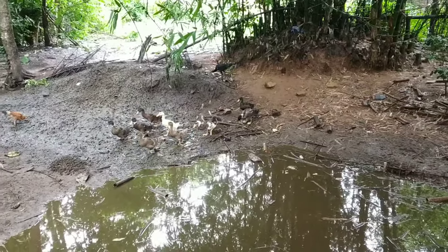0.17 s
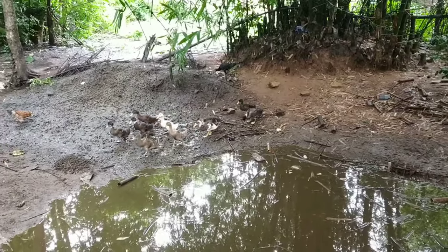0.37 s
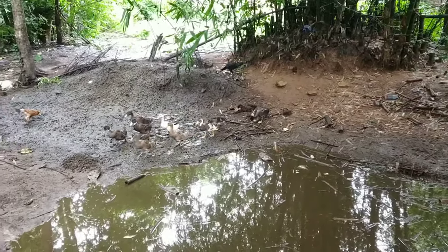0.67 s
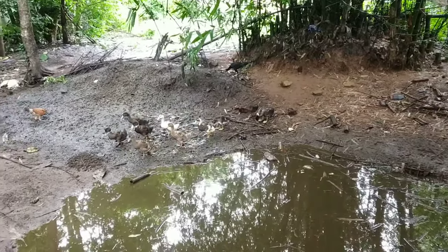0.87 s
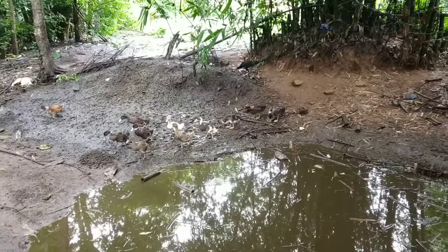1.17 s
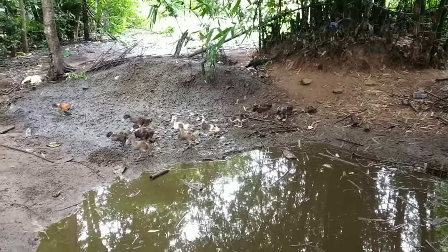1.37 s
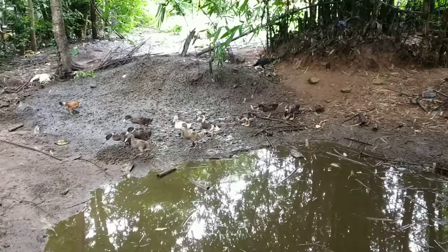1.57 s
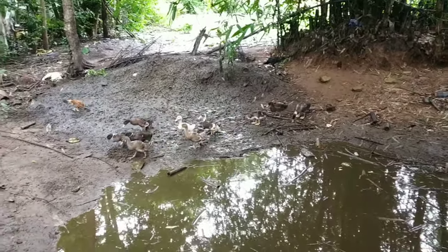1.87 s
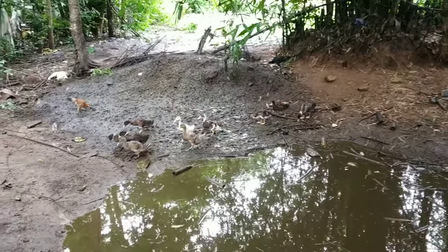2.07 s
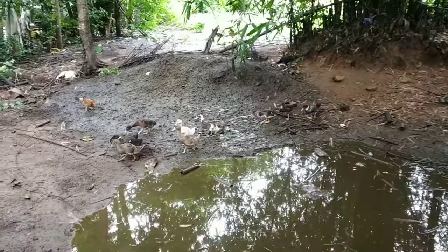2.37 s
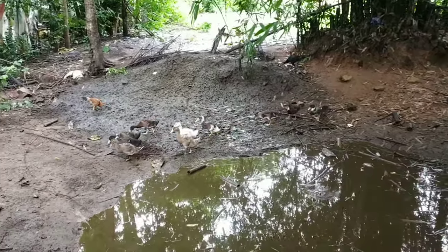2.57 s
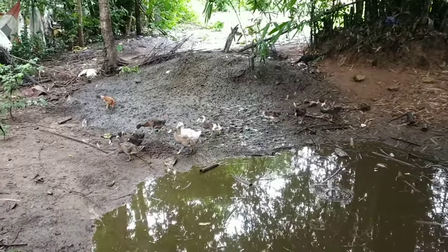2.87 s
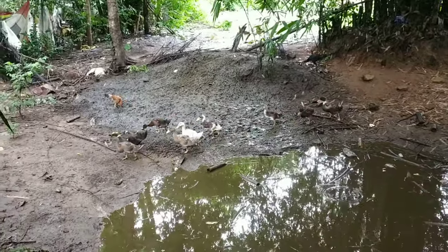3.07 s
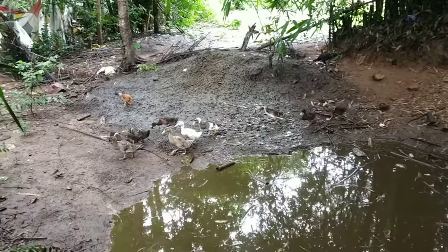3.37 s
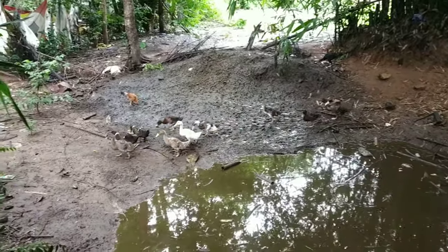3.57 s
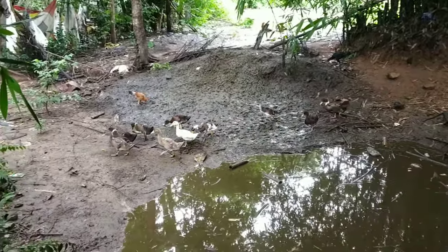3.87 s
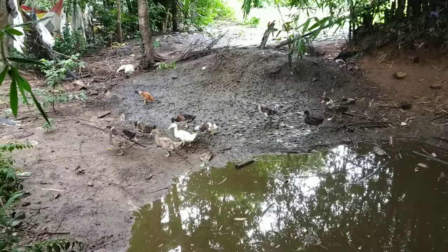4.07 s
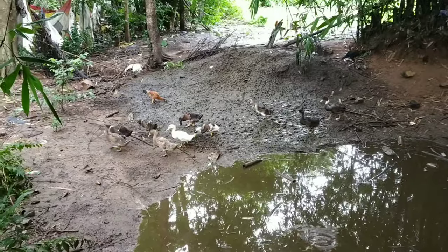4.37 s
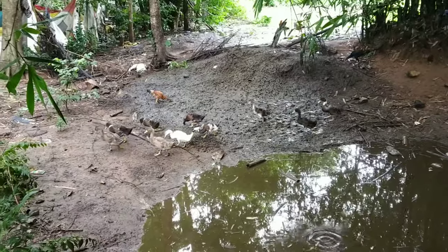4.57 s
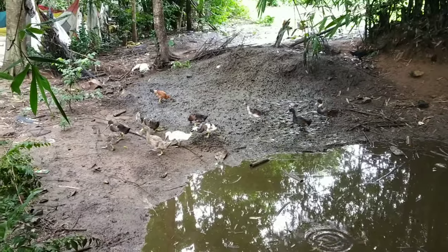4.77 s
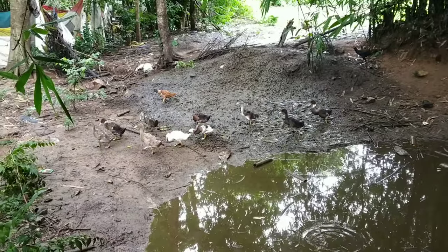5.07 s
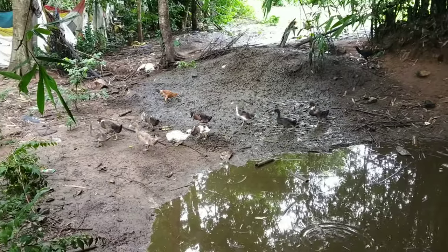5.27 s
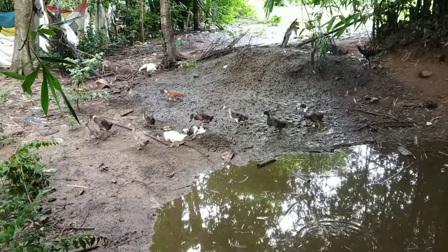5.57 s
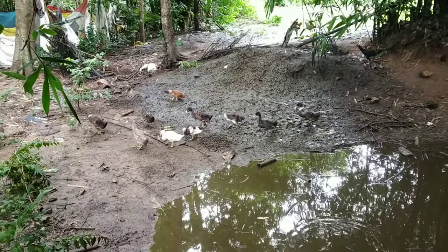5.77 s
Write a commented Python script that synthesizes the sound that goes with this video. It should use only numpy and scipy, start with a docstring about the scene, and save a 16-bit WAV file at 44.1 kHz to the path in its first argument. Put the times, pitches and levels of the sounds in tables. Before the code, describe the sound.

A flock sifts wet mud beneath bamboo, making a dense bed of tiny clicks with snapping smacks and a few longer splashes throughout. Peeps come in quick slurs at first and stop around three seconds; a raspy trill follows, then four thin whistles near the end. Sparse muted clucks and drops punctuate it. A far pump-like engine throbs quietly under smooth hiss, captured by a stereo microphone in open air with little echo.

```python
"""Beside a pond, under bamboo, ducks and a few hens forage in wet mud. Bills and feet smack and splash as
clustered noise bursts; peeps, clucks and wild birds are gliding tones, one a pulse-driven rasping trill.
Drops plop as decaying sines that rise. Behind lie a hiss of leaves and a soft wash, both filtered noise,
and the throb of a far engine, perhaps a pump, as exhaust resonances. The grove adds short scatter."""
import sys
import numpy as np
from scipy import signal
from scipy.fft import rfft, irfft
from scipy.io import wavfile

SR = 44100
rng = np.random.default_rng(int(sys.argv[2]) if len(sys.argv) > 2 else 0)


def store_wav(level_fs):
    """Save 16-bit WAV to argv[1]."""
    pcm = np.round(np.clip(np.atleast_2d(level_fs), -1, 1) * 32767)
    wavfile.write(sys.argv[1], SR, pcm.T.astype(np.int16))


N = 261072
TIME = np.arange(N) / SR
EDGE_HZ = 15700  # upper limit of the band

# How busily the flock dabbles. Each row: time in seconds, relative level in dB.
BUSY_CURVE = [(0.0, -43), (0.69, -44.5), (1.6, -42.5), (1.94, -43.5), (2.16, -43), (4.32, -45), (4.65, -41),
              (5.2, -43), (5.92, -43.5)]


def gain_of(db):
    """Level is logarithmic: 20 dB is a factor of ten in amplitude."""
    return 10 ** (np.asarray(db) / 20)


def evened(x):
    """Root-mean-square amplitude measures strength; it is scaled to 1."""
    return x / np.sqrt(np.mean(x ** 2) + 1e-20)


def read(points, hz):
    """Interpolates a spectrum along log frequency, so that octaves have nearly equal length."""
    f, value = np.transpose(points)
    return np.interp(np.log(hz + 1), np.log(f + 1), value)


def swing_db(curve):
    """Rise and fall of a level curve about its mean in dB."""
    s, db = np.transpose(curve)
    return np.interp(TIME, s, db - db.mean())


def add(mix, s, sound):
    """Superposition: a sound starting at s seconds sums with those already there."""
    part = mix[..., max(round(s * SR), 0):][..., :sound.shape[-1]]
    part += sound[..., :part.shape[-1]]


def shaped(x, curve_db):
    """Linear filtering: each frequency is scaled by the gain in dB that the function gives for it."""
    size = x.shape[-1]
    return irfft(rfft(x) * gain_of(curve_db(np.fft.rfftfreq(size, 1 / SR))), size)


def wander(size, rate_hz):
    """Low-passed noise drifts at random, no faster than about the given rate."""
    noise = rng.standard_normal(size + SR // 4)
    slow = shaped(noise, lambda f: -10 * np.log10(1 + (f / rate_hz) ** 4))
    return evened(slow)[:size]


def grove(x):
    """Sparse scattering: stems and ground give a short decaying tail, different at each port."""
    # Ring of the grove. Each row: frequency in Hz, time to fall by 60 dB in seconds.
    ring_times = [(300, 0.13), (2000, 0.17), (6000, 0.29), (15000, 0.13)]
    size = SR // 2
    echoes = rng.standard_normal((2, size)) * (rng.random((2, size)) < .15)
    hz, t, bands = signal.stft(echoes, SR, nperseg=256)
    decay_db = -60 * t / read(ring_times, hz)[:, None]
    tail = signal.istft(bands * gain_of(decay_db), SR, nperseg=256)[1]
    return signal.fftconvolve(np.atleast_2d(x), tail / np.linalg.norm(tail[0]), axes=1)[:, :N]


def placed(x, direct_db, wet_db, pan_db):
    """Level difference between the ports sets the side; scattered sound joins the direct sound."""
    pan = np.array([[pan_db], [-pan_db]]) / 2
    return x * gain_of(direct_db + pan) + gain_of(wet_db) * grove(x)


def leaves(level_db=-45):
    """Diffuse noise: leaves and distant rustling hiss smoothly, alike at both ports only in the bass."""
    # Spectrum of leaves and far surroundings. Each row: frequency in Hz, relative density in dB per Hz.
    air_spectrum = [(25, -42), (70, -13.5), (120, 4), (200, 15.5), (310, 8.5), (440, 3.5), (580, 4.5),
                    (720, 7.5), (950, -5.5), (1400, -3.5), (2500, -4.5), (3300, -7.5), (4200, -7.5),
                    (5000, -6), (6000, -2), (16000, 0)]
    # Each row: frequency in Hz, left-right likeness from 0 to 1 before its treble roll-off.
    likeness = [(60, 1), (150, 0.93), (380, 0.89), (950, 0.21), (2380, 0.078), (5980, 0.01), (15000, 0.83)]
    a, b = rfft(rng.standard_normal((2, N)))
    hz = np.fft.rfftfreq(N, 1 / SR)
    same = np.clip(read(likeness, hz), 0, 1) / (1 + (hz / 2500) ** 2)
    ports = np.array([a, same * a + np.sqrt(1 - same ** 2) * b])
    pair = irfft(ports * gain_of(read(air_spectrum, hz)), N)
    return evened(pair) * gain_of(level_db + swing_db(BUSY_CURVE) / 2)


def wash(centre_hz=950, db_per_octave=9):
    """Band-shaped noise: a soft, dull wash falls off to both sides of its centre and comes and goes."""
    # Each row: time in seconds, level in dB.
    wash_levels = [(1.0, -60), (2.9, -61), (4.2, -58), (4.55, -56.5), (5.2, -53), (5.45, -62)]
    noise = shaped(rng.standard_normal((2, N)),
                   lambda f: -db_per_octave * abs(np.log2((f + 1) / centre_hz)))
    return evened(noise) * gain_of(np.interp(TIME, *np.transpose(wash_levels)))


def engine(turns_per_s=24.635, idle=0.71, side_db=-21):
    """Amplitude modulation: thumps in each turn make exhaust resonances of tone and noise throb."""
    # Exhaust resonances. Each row: frequency in Hz, half-width in Hz at -6 dB, relative level in dB,
    # steady (tonal) share of the power from 0 to 1 in the middle signal.
    resonances = [(184.1, 9.72, -52.5, 0.79), (201, 17, -58, 0.13), (262.7, 13.68, -54, 0.57),
                  (231, 40, -60.5, 0)]
    # Each row: place as a share of the turn, half-width as a share of the turn, relative height.
    thumps = [(.03, 0.22, 0.81), (.37, 0.2, 0.83), (.63, 0.24, 0.049)]
    # The engine swells and fades on the air. Each row: time in seconds, relative level in dB.
    drift = [(0, -3), (1.1, -0.5), (2.2, 0), (2.9, -3.5), (3.6, -3), (4.2, -1.5), (5.2, -4.5), (5.9, 2)]
    turn = TIME * turns_per_s
    throb = idle
    for at, w, height in thumps:
        offset = (turn - at + .5) % 1 - .5
        throb = throb + height * np.exp(-(offset / w) ** 2)
    drone = np.zeros((2, N))  # middle and side signals
    for hz, width, db, steady in resonances:
        noise = rng.standard_normal((2, N))
        ring = evened(shaped(noise, lambda f: -20 * np.log10(1 + ((f - hz) / width) ** 2)))
        wavering_hz = hz + width / 2 * wander(N, 8.92)
        tone = evened(np.sin(2 * np.pi * np.cumsum(wavering_hz) / SR))
        steady = np.clip(steady, 0, 1)
        ring[0] = np.sqrt(steady) * tone + np.sqrt(1 - steady) * ring[0]
        drone += gain_of(db) * ring
    mid, side = drone * evened(throb) * gain_of(swing_db(drift))
    return np.array([mid + gain_of(side_db) * side, mid - gain_of(side_db) * side])


def voiced(hz, rough, husk, husk_hz, overtone_db, swell):
    """A modulated tone: pitch trembles, and random modulation lays a husky noise band about it."""
    tremble = wander(SR // 4, 350)[:len(hz)]
    in_step, across = (wander(SR // 4, husk_hz)[:len(hz)] for _ in range(2))
    phase = 2 * np.pi * np.cumsum(hz * (1 + rough * tremble)) / SR
    note = (1 + husk * in_step) * np.sin(phase) + husk * across * np.cos(phase)
    note = note + gain_of(overtone_db) * np.sin(2 * phase)
    return evened(note * signal.windows.cosine(len(hz)) ** swell)


def calls(rows, rough, overtone_db, husk_hz, swell):
    """Frequency glides: each note follows a parabola through three pitches, loudest in the middle."""
    out = np.zeros(N)
    for s, length, first_hz, middle_hz, last_hz, db, husk in rows:
        arch = np.polyfit([0, .5, 1], [first_hz, middle_hz, last_hz], 2)
        pitch = np.polyval(arch, np.linspace(0, 1, max(int(length * SR), 64)))
        add(out, s, gain_of(db) * voiced(pitch, rough, husk, husk_hz, overtone_db, swell))
    return out


def husky(rows, husk):
    """Equal modulation depth gives all notes of one bird the same huskiness."""
    return [(*row, husk) for row in rows]


def trill(pulse_hz=115, jitter=0.32, uneven_db=3, sag=0.11, settle_s=0.021):
    """Source and filter: uneven pulses ring two close throat resonances, which sag as the rasp swells."""
    # Throat of the bird. Each row: settled frequency in Hz, width in Hz at -3 dB, relative level in dB.
    throat = [(1966, 220, -1.5), (2310, 120, -7)]
    start_s, attack_s, hold_s, release_s = 3.385, .07, .06, .13
    peak_db, swell_db, fade_db = -41, 8, 17  # level in the hold, before placing; rise to it; fall from it
    corners = np.cumsum([0, attack_s, hold_s, release_s])
    t = np.arange(0, corners[-1], 1 / SR)
    level_db = peak_db - np.interp(t, corners, [swell_db, 0, 0, fade_db])
    turns = np.cumsum(pulse_hz * np.exp(jitter * wander(SR // 2, 90)[:len(t)])) / SR
    pulses = np.diff(np.floor(turns), prepend=0)
    pulses = pulses * gain_of(uneven_db * wander(SR // 2, 166)[:len(t)])
    voice = 0
    for hz, width, db in throat:
        sagging_hz = hz * (1 + sag * np.exp(-t / settle_s))
        turn = np.exp(2j * np.pi * np.cumsum(sagging_hz) / SR)
        # a low-pass around the moving pitch acts as a moving resonance
        low_pass = signal.butter(2, width / 2, fs=SR, output="sos")
        ring = signal.sosfilt(low_pass, pulses / turn)
        voice = voice + gain_of(db) * evened((ring * turn).real)
    out = np.zeros(N)
    add(out, start_s, gain_of(level_db) * evened(voice))
    return out


def whistles(overshoot=0.137, settle_s=0.0082):
    """Exponential settling: each whistle of a bird in the trees starts sharp, drops and holds its pitch."""
    # Each row: start in seconds, length in seconds, settled pitch in Hz, level in dB before placing.
    whistle_rows = [(4.572, 0.13, 2745, -51), (4.785, 0.061, 2770, -52), (4.99, 0.15, 2781, -50),
                    (5.454, 0.18, 2787, -49)]
    out = np.zeros(N)
    for s, length, hz, db in whistle_rows:
        t = np.arange(0, length, 1 / SR)
        pitch = hz * (1 + overshoot * np.exp(-t / settle_s))
        note = voiced(pitch, rough=0.013, husk=0.59, husk_hz=70, overtone_db=-38, swell=0.3)
        add(out, s, gain_of(db) * note)
    return out


def plops():
    """Bubble resonance: each rings for a short time and rises as it nears the surface."""
    # Drops and bubbles. Each row: start in seconds, first pitch in Hz, level in dB before placing,
    # rise in octaves per second (up to one octave), decay time in seconds.
    plop_rows = [(1.147, 700, -28, 10, 0.0028), (1.362, 1500, -28, 90, 0.0015),
                 (1.633, 2420, -25, 8, 0.0021), (2.187, 5940, -30.5, 39, .002),
                 (3.327, 1100, -32, 160, 0.0015), (3.38, 2420, -34, 60, 0.0017),
                 (3.69, 1100, -34, 150, .0012), (3.988, 1630, -26, 220, 0.0019),
                 (5.032, 1040, -19, 7.2, 0.0017), (5.396, 3470, -33.5, 2, 0.0024),
                 (5.589, 1670, -27.5, 22, 0.0017)]
    out, t = np.zeros(N), np.arange(SR // 40) / SR
    for s, hz, db, rise, decay in plop_rows:
        pitch = hz * 2 ** np.minimum(rise * t, 1)
        ring = np.exp(-t / decay) * (1 - np.exp(-2 * t * hz))
        add(out, s, gain_of(db) * ring * np.sin(2 * np.pi * np.cumsum(pitch) / SR))
    return out


def burst(decay, tilt_db, grain_db, shared, snap=0, colour_db=0.0, rise_s=0.0021):
    """Impulsive noise: tiny bursts cluster, with a water-film snap if asked; cavities may colour them."""
    t = np.arange(SR // 4) / SR
    steps = np.repeat(rng.standard_normal(len(t)), 12)[:len(t)].clip(-2, 2)  # one level per 12 samples
    grains = gain_of(grain_db * steps)
    common, own = rng.standard_normal(len(t)), rng.standard_normal((2, len(t)))
    noise = shared * common + own
    fade = np.exp(-t / max(decay, .0005)) * (1 - np.exp(-t / rise_s))
    crack = snap * np.exp(-((t - .0013) / .0003) ** 2)
    # differencing makes the snap brighter than the rest
    cluster = noise * evened(grains) * fade + np.diff(noise * crack, prepend=0)
    cavities = np.linspace(0, SR / 2, num=30)
    peaks_db = colour_db * rng.uniform(-3.5, 1, len(cavities))

    def colour(f):
        """Spectral tilt in dB per octave plus hollow peaks and dips."""
        octaves = np.log2(np.clip(f, 700, EDGE_HZ) / 7000)
        return tilt_db * octaves + np.interp(f, cavities, peaks_db)

    band = signal.butter(2, [450, EDGE_HZ], "band", fs=SR, output="sos")
    cluster = signal.sosfilt(band, shaped(cluster, colour))
    return evened(cluster) * np.sqrt(np.mean(fade ** 2))


def dabbling(level_db=-52.5, per_s=260, wet_db=0):
    """Random superposition: many small ticks of bills sifting the mud fall at independent times."""
    out, decays = np.zeros((2, N)), np.geomspace(.001, .007, num=120)  # decay times in seconds
    ticks = []
    for decay in decays:
        tick = burst(decay, rng.normal(.3, .5), grain_db=4, shared=.6, colour_db=7)
        ticks.append(evened(tick)[:, :2048])
    for when, which, chance in rng.random((int(per_s * N / SR), 3)):
        size = gain_of(3.5 * min(-np.log(1 - chance), 2.5))  # large ticks are rare
        add(out, when * N / SR, size * ticks[int(which * len(ticks))])
    out = evened(out) * gain_of(level_db + swing_db(BUSY_CURVE))
    return out + gain_of(wet_db) * grove(out)


def mud(smack_db=-2.5, splash_db=-1, wet_db=-3):
    """Impact noise: bills and feet excite short smacks and longer splashes, scattered by the grove."""
    # Sharp wet smacks. Each row: start in seconds, relative level in dB, decay time in seconds,
    # brightness in dB per octave.
    smack_rows = [(.121, -29.5, 0.0054, 5), (0.1795, -24.5, 0.0037, 2), (0.308, -22.5, 0.0051, 0.5),
                  (.409, -25, 0.0029, -0.5), (0.5435, -28, 0.0068, 1.5), (0.647, -15.5, 0.0038, 1),
                  (.751, -25.5, 0.0032, -0.5), (0.783, -21.5, 0.0044, 1.5), (1.094, -28, .002, -2),
                  (1.106, -31, .003, -3), (1.1416, -30, 0.006, -2.5), (1.1778, -22.5, 0.003, 4),
                  (1.258, -25, 0.0026, -1), (1.3606, -22.5, 0.0024, -3), (1.4691, -11.5, 0.0026, 7.5),
                  (1.628, -29, 0.0068, -1), (1.7225, -21, 0.0013, 3), (2.1872, -26.5, 0.0023, -3),
                  (2.256, -19, .002, 7), (2.689, -33.5, 0.0072, -3), (2.902, -33, 0.0018, -1),
                  (3.082, -21.5, 0.002, -2), (3.1373, -15, 0.0027, 0.5), (3.1784, -18.5, 0.0037, 11),
                  (3.3894, -19, 0.0025, -1.5), (3.454, -21.5, 0.0039, 6.5), (3.632, -32.5, 0.0068, 1.5),
                  (3.784, -27, 0.0065, 11), (3.886, -31, 0.0053, 1.5), (3.958, -27, .003, 9),
                  (4.047, -12, 0.0019, 11), (4.2885, -20.5, 0.0044, 3), (4.408, -19, .0012, 10),
                  (4.601, -32, 0.0016, 5), (4.954, -17, 0.0022, 4), (5.031, -24, 0.0024, -1),
                  (5.132, -42, 0.003, -10), (5.271, -30.5, 0.0043, 0), (5.367, -28.5, 0.0039, 3),
                  (5.557, -18.5, .0034, 16), (5.58, -19.5, 0.0048, 6), (5.7494, -24.5, 0.0032, 7)]
    # Longer splashes. Each row: start in seconds, relative level in dB, decay time in seconds,
    # brightness in dB per octave.
    splash_rows = [(0.005, -47.5, 0.12, 3), (0.925, -42, 0.13, 5), (1.591, -36.5, 0.065, 9.5),
                   (2.114, -43, 0.05, 0), (3.141, -41, 0.15, 5), (4.08, -38, 0.019, 6),
                   (4.474, -35.5, 0.012, 4.5), (4.53, -38, .014, 15), (4.66, -57, .04, -5),
                   (4.794, -29, 0.023, 19)]
    out = np.zeros((2, N))
    for s, db, decay, tilt_db in smack_rows:
        smack = burst(decay, tilt_db, grain_db=3.0, shared=0.3, snap=0.99)
        add(out, s, gain_of(db + smack_db) * smack)
    for s, db, decay, tilt_db in splash_rows:
        splash = burst(decay, tilt_db, grain_db=-1, shared=0.81)
        add(out, s, gain_of(db + splash_db) * splash)
    return out + gain_of(wet_db) * grove(out)


def scene():
    """Superposition of the far engine, leaves and wild birds with the flock and the water near by."""
    # Thin falling chirp of a small bird. Each row: start in seconds, length in seconds,
    # first, middle and last pitch in Hz, level in dB before placing.
    chirp_rows = [(.872, .074, 5000, 4800, 4300, -55.5)]
    # Soft low clucks. Each row: start in seconds, length in seconds,
    # first, middle and last pitch in Hz, level in dB before placing.
    cluck_rows = [(.01, 0.19, 383, 404, 380, -58.5), (1.24, 0.037, 680, 757, 800, -48),
                  (1.745, 0.046, 687, 746, 780, -54), (3.527, .052, 797, 805, 830, -50),
                  (4.035, 0.055, 798, 861, 780, -50), (4.515, 0.035, 693, 767, 720, -47.5),
                  (5.06, 0.19, 731, 793, 734, -52)]
    # Duckling peeps, quick slurs and longer round arches. Each row: start in seconds, length in seconds,
    # first, middle and last pitch in Hz, level in dB before placing, huskiness as modulation depth.
    peep_rows = [(.005, 0.024, 2280, 1830, 1430, -48.5, .3), (.408, 0.03, 1430, 1790, 2400, -50.5, 0.44),
                 (.452, 0.025, 2520, 1800, 1300, -50, .2), (.578, 0.016, 1350, 1840, 2400, -44.5, 0.37),
                 (.631, 0.02, 2330, 1720, 1440, -42.5, 0.18), (.725, .018, 1350, 1800, 2300, -45.5, .25),
                 (.785, 0.017, 2350, 1940, 1450, -54, .3), (.9, .022, 1450, 1840, 2200, -52, .4),
                 (1.096, .018, 1800, 2150, 2400, -52.5, 0.33), (1.152, 0.021, 2440, 2050, 1750, -46.5, .9),
                 (1.195, 0.025, 2910, 2180, 1550, -50.5, 0.57),
                 (1.264, 0.031, 1750, 2140, 2400, -50.5, 0.97), (1.322, 0.086, 1854, 2200, 1850, -50, 0.49),
                 (1.456, .058, 1590, 2005, 1700, -51.5, 0.22), (1.584, .028, 1600, 1850, 2050, -50, .25),
                 (1.602, 0.093, 1950, 2460, 1650, -54, 0.81), (1.645, 0.023, 2410, 2090, 1800, -51, .5),
                 (1.778, .05, 1700, 2240, 2500, -56.5, .7), (1.822, 0.033, 2650, 2105, 1450, -53.5, .5),
                 (2.085, 0.054, 2790, 2920, 2150, -53.5, .2), (2.263, 0.059, 1596, 2150, 1700, -55.5, .15),
                 (2.435, 0.079, 1800, 2250, 1720, -57.5, 0.47), (2.71, .035, 1350, 1240, 1200, -53, 0.33),
                 (2.772, .032, 2060, 1744, 1450, -54, .4), (2.915, 0.032, 1410, 1594, 1600, -52.5, 0.5),
                 (2.98, .07, 1555, 1516, 1250, -56, .4)]
    background = leaves() + engine() + wash()

    chirps = calls(husky(chirp_rows, husk=.1), rough=0.0066, overtone_db=-24, husk_hz=430, swell=.6)
    wild_birds = placed(chirps, direct_db=-5.5, wet_db=-16.5, pan_db=7)
    wild_birds += placed(whistles(), direct_db=-11.0, wet_db=-7.5, pan_db=10)
    wild_birds += placed(trill(), direct_db=-10.0, wet_db=-6.5, pan_db=-3)

    water = placed(plops(), direct_db=-4.5, wet_db=-7, pan_db=3.5)

    clucks = calls(husky(cluck_rows, husk=0.53), rough=0.054, overtone_db=-17, husk_hz=200, swell=0.43)
    peeps = calls(peep_rows, rough=0.013, overtone_db=-13, husk_hz=338, swell=0.83)
    flock = placed(clucks, direct_db=-6.0, wet_db=-7, pan_db=0)
    flock += placed(peeps, direct_db=-4, wet_db=-7, pan_db=4.5)
    return background + wild_birds + water + flock + dabbling() + mud()


def record(dry):
    """Frequency response: each microphone port colours the treble its own way; then the band limit."""
    # Colour of the left port. Each row: frequency in Hz, gain in dB.
    left_port = [(700, -1.5), (2000, 3.5), (3000, 5), (4000, 7.5), (4800, 11.5), (5700, 12), (7000, 8),
                 (9400, 5.5), (10600, 8.5), (12000, 4.5), (13700, 0), (15300, -1.5)]
    # Colour of the right port. Each row: frequency in Hz, gain in dB.
    right_port = [(700, -0.5), (2000, 2.1), (3500, 4.5), (4500, 1.5), (9400, -2), (10500, -0.5),
                  (11100, -5), (15000, -7)]
    left = shaped(dry[0], lambda f: read(left_port, f))
    right = shaped(dry[1], lambda f: read(right_port, f))
    edge = signal.firwin(255, EDGE_HZ, window=("kaiser", 9), fs=SR)
    return signal.oaconvolve(np.array([left, right]), edge[None], "same", axes=1)


dry = scene()
out = record(dry)
store_wav(out)
```